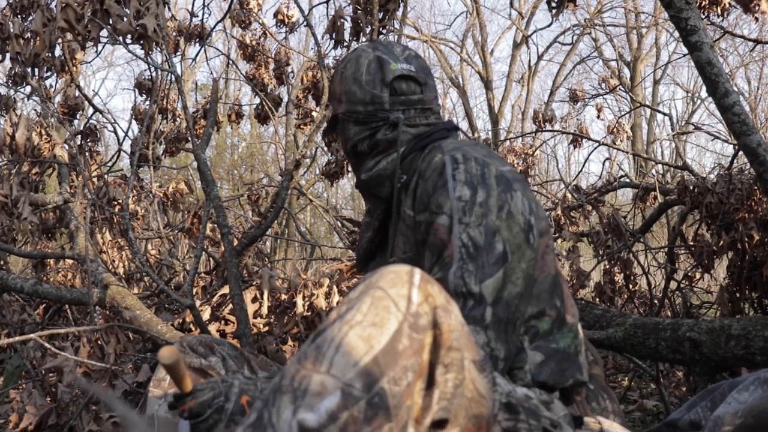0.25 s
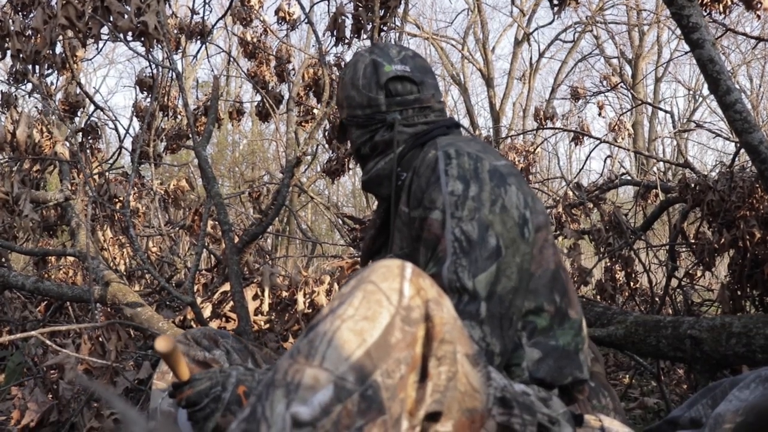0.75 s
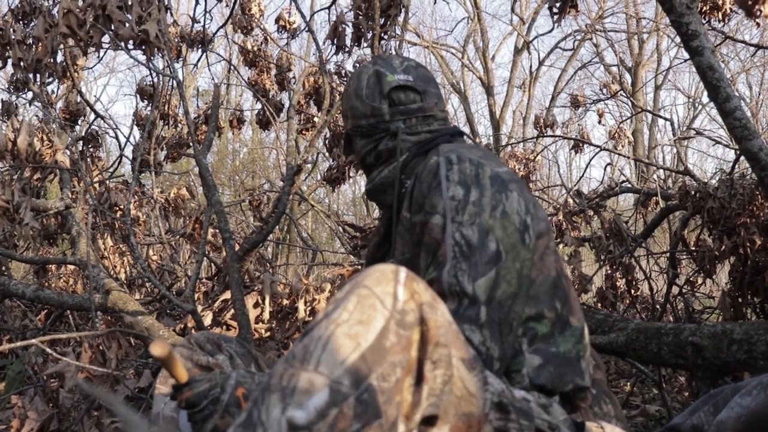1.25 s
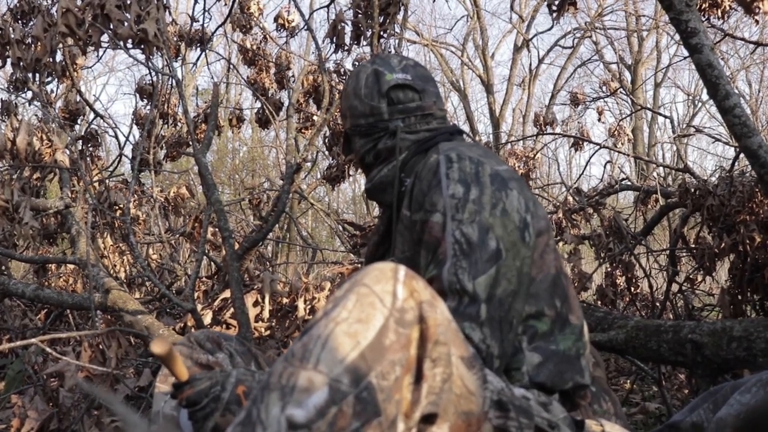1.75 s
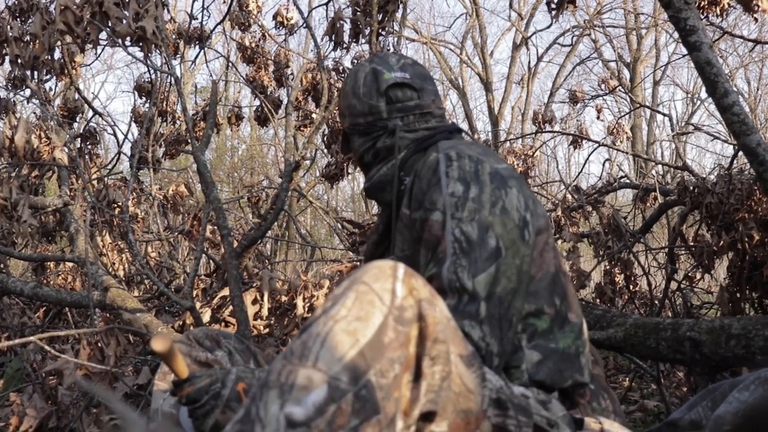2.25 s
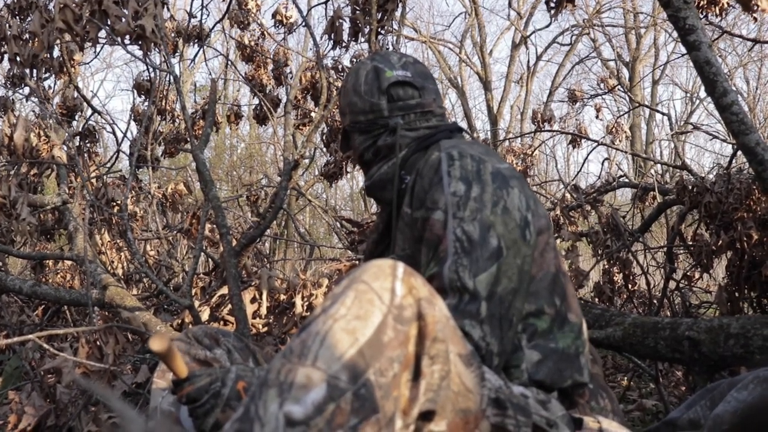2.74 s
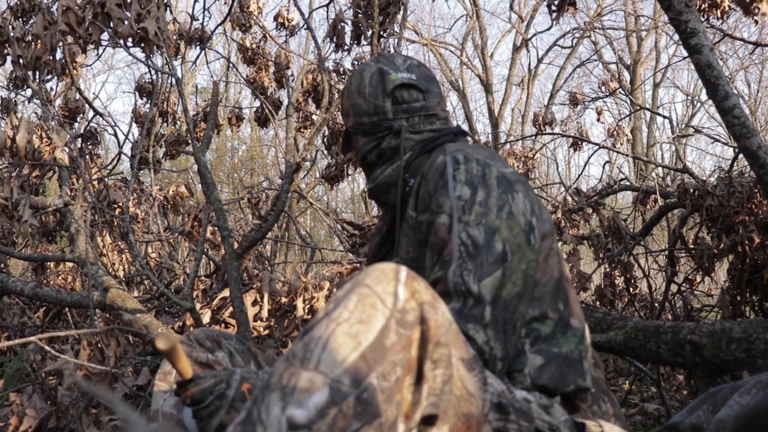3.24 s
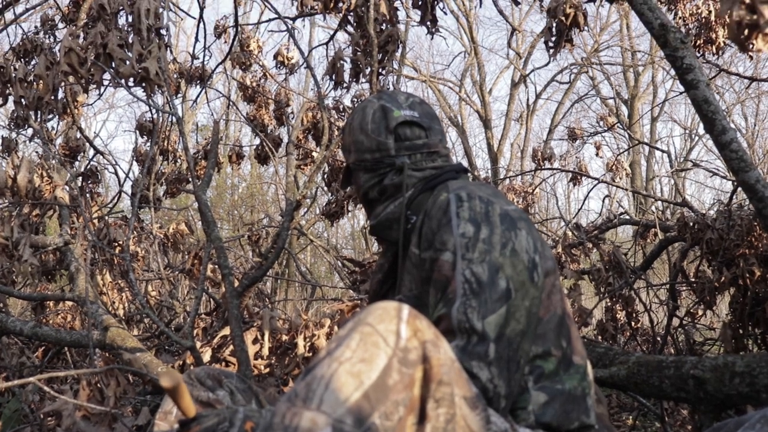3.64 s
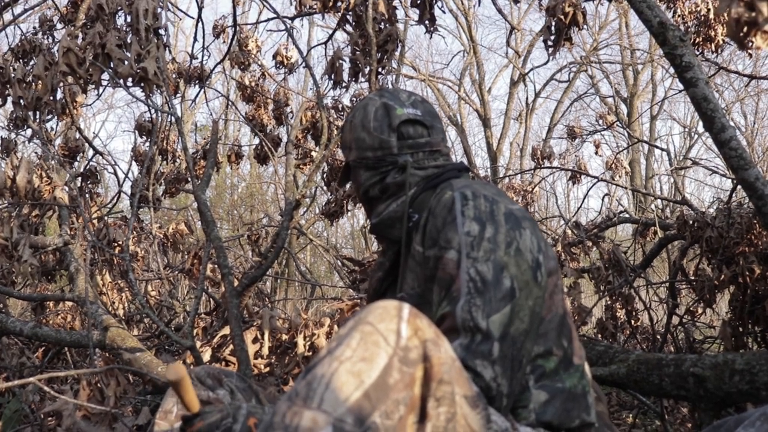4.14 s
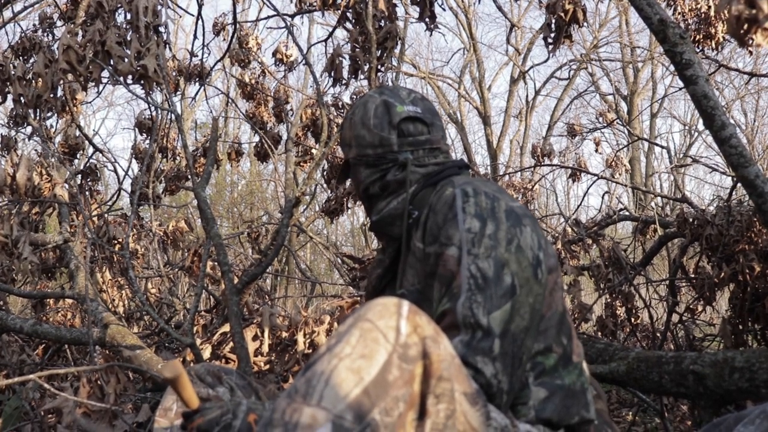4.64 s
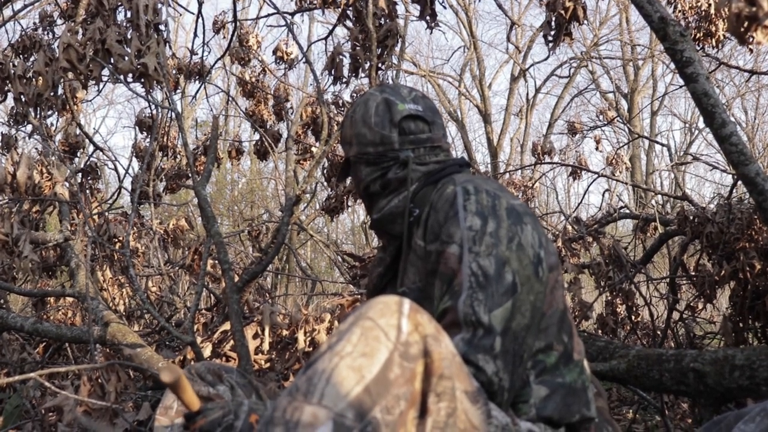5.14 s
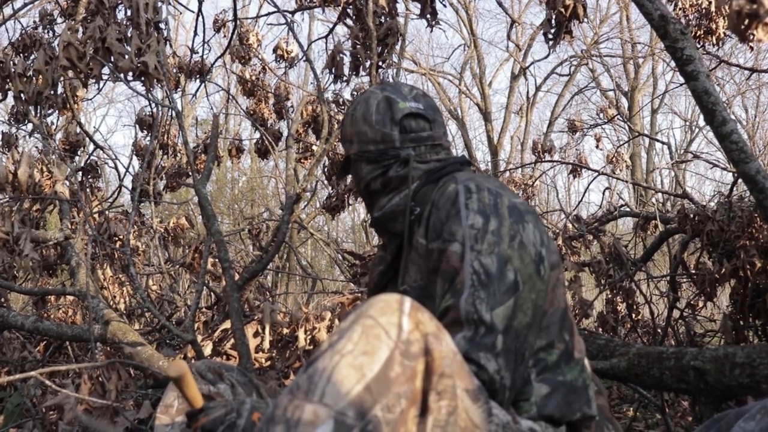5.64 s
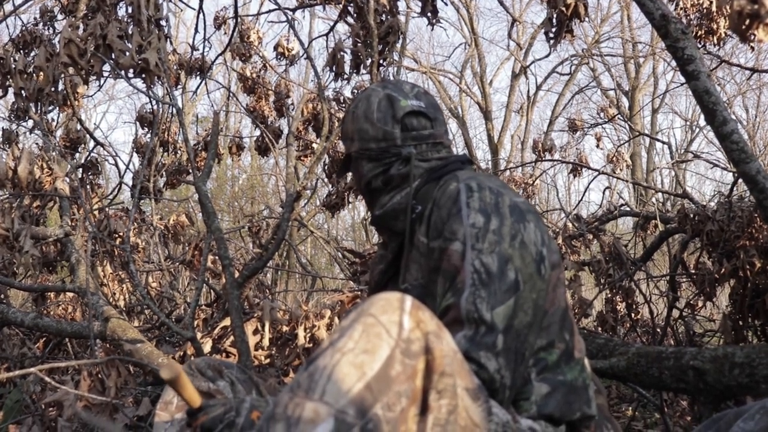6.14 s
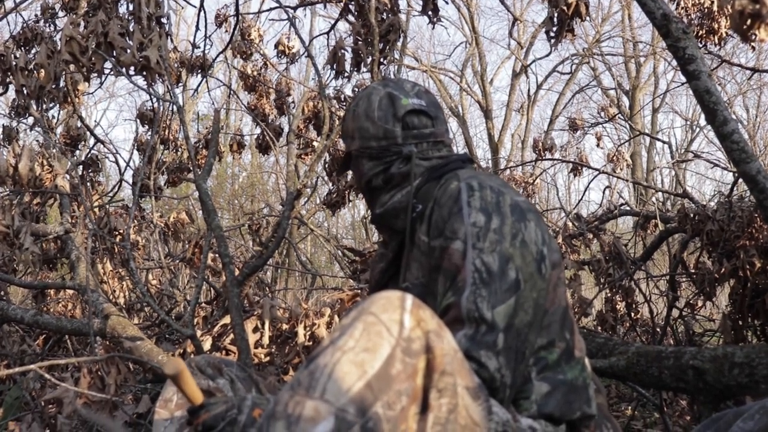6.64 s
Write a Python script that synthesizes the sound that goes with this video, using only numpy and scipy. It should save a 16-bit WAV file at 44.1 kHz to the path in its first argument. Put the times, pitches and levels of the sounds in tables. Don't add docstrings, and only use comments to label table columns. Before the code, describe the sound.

Outdoors in quiet woods, wind thumps softly on the microphone and a far hoarse bird screams. Very close, a striker dragged over a friction call stutters in short purring clusters, pauses, purrs again, then from about three seconds settles into regular, nasal, raspy turkey yelps that grow stronger. Faint dry scrapes fill the gaps as the tip slides back.

```python
import sys
import numpy as np
from scipy import signal
from scipy.fft import rfft, irfft, next_fast_len
from scipy.io import wavfile
from scipy.ndimage import uniform_filter1d, minimum_filter1d

SR = 44100
rng = np.random.default_rng(int(sys.argv[2]) if len(sys.argv) > 2 else 0)


def inscribe(sig):
    pcm = np.round(np.clip(np.atleast_2d(sig).T, -1, 1) * 32767)
    wavfile.write(sys.argv[1], SR, pcm.astype(np.int16))


def to_linear_factor(level_db):
    exponent = np.asarray(level_db, float) / 20
    return 10 ** exponent


N = 303849
T = np.arange(N) / SR


def read(points, hz):
    f, value = np.transpose(points)
    return np.interp(np.log(hz + 1), np.log(f + 1), value)


def noise(points):
    size = next_fast_len(N)
    hz = np.fft.rfftfreq(size, 1 / SR)
    x = irfft(rfft(rng.standard_normal(size)) * to_linear_factor(read(points, hz)), size)[:N]
    return x / np.sqrt(np.mean(x ** 2) + 1e-20)


def wander(hz):
    return noise([(1, -.01), (hz, -.01), (3 * hz, -60)])


def wind():
    # centre in seconds, half length in seconds, buffeting in dB, rush in dB.
    gusts = [(.1, 0.31, -45.5, -61), (0.595, 0.33, -51, -80), (1.09, 0.3, -43, -48.5),
             (1.362, 0.14, -42.5, -54), (1.98, 0.24, -47.5, -77), (2.753, 0.12, -67, -56),
             (2.98, 0.13, -50.5, -59.5), (3.36, 0.15, -47.5, -55.5), (3.65, 0.11, -58, -53.5),
             (6.1, 0.092, -75, -64.5), (6.53, 0.085, -49, -72)]
    # frequency in Hz, level in dB per Hz.
    air = [(35, -33), (60, -0.5), (115, -0.5), (290, -14.5), (550, -19.5), (1000, -12.5), (1700, -16),
           (3300, -12), (5300, -20.5), (15700, -28)]
    calm_buffet_db, calm_rush_db, air_db = -57, -56, -53
    buffet_gain, rush_gain = to_linear_factor(calm_buffet_db), to_linear_factor(calm_rush_db)
    for centre_s, half_s, buffet_db, rush_db in gusts:
        bell = np.exp(-((T - centre_s) / half_s) ** 2)
        buffet_gain = buffet_gain + to_linear_factor(buffet_db) * bell
        rush_gain = rush_gain + to_linear_factor(rush_db) * bell
    buffet = noise([(5, -35.5), (18, 6.5), (35, -11.0), (60, -20.5), (120, -22.5), (300, -69.0)])
    rush = noise([(60, -24), (130, -0.5), (300, -7), (500, -9), (900, -10), (2000, -32.0)])
    lumps = to_linear_factor(1.1 * wander(4))
    return (buffet * buffet_gain + rush * rush_gain * to_linear_factor(-5.5)) * lumps + to_linear_factor(air_db) * noise(air)


def woodland(x):
    t60_s, spacing = 0.38, 22
    taps = np.zeros(SR // 2)
    at = np.arange(500, SR // 2 - spacing, spacing)
    signs = rng.choice([-1., 1.], len(at))
    taps[at + rng.integers(0, spacing, len(at))] = signs * to_linear_factor(-60 * at / SR / t60_s)
    return signal.fftconvolve(x, taps / np.linalg.norm(taps))[:N]


def bird():
    # start in seconds, length in seconds, pitch in Hz, partials two, three and four in dB.
    screams = [(0.173, 0.36, 829, -99, -55, -57), (1.153, 0.29, 832, -71, -57, -56.5),
               (2.36, 0.41, 818, -61, -72, -62), (3.205, 0.27, 848, -83, -61, -58),
               (3.332, 0.21, 815, -86, -55.5, -53.5), (3.591, 0.31, 815, -78, -58, -56.5),
               (4.04, 0.5, 838, -76.5, -76, -58.5), (4.402, 0.2, 790.5, -64.5, -88, -57.5)]
    out = np.zeros(N)
    shake, flutter = wander(65), wander(77)
    for start_s, length_s, hz, *partials_db in screams:
        on = (T >= start_s) & (T < start_s + length_s)
        u = (T[on] - start_s) / length_s
        turns = 2 * np.pi * np.cumsum(hz * (1 + .006 - .022 * u + .011 * shake[on])) / SR
        voice = sum(to_linear_factor(db) * np.cos(k * turns) for k, db in enumerate(partials_db, 2))
        out[on] += voice * np.sin(np.pi * u) ** 0.5 * to_linear_factor(0.76 * flutter[on])
    return out + woodland(out)


def skips():
    # peak in seconds,
    # level in dB, half length in ms, pitch at the peak in Hz.
    slips = [(0.282, -26, 2.96, 746), (.334, -21.5, 5.7, 733), (0.364, -35, 2.8, 744),
             (.392, -19, 4.8, 752), (.434, -18.5, 6.7, 764), (0.479, -17.5, 6.6, 708),
             (1.01, -23.5, 4.9, 738), (1.072, -25, 2.9, 753), (1.147, -20.5, 6.3, 698),
             (1.197, -27.5, 5.1, 745), (1.24, -25.5, 8.2, 735.6), (1.275, -23.5, 11.5, 706.5),
             (1.322, -28, 9.1, 746), (1.62, -32.5, 4.6, 743), (1.65, -25.5, 4.7, 719),
             (1.687, -23, 7.4, 722), (1.727, -20, 6.6, 694), (1.767, -21.5, 8.7, 735),
             (1.807, -23, 6.7, 762.5), (1.838, -23, 6.7, 748),
             (2.152, -37, 6.1, 723), (2.176, -31, 11.5, 713), (2.209, -25.5, 8.8, 671),
             (2.25, -25.5, 7.1, 715.5), (2.276, -27.5, 11.8, 735), (2.304, -30, 12.5, 767),
             (2.33, -26.5, 7.6, 756), (2.678, -33.5, 18.2, 761), (2.714, -27.5, 13.2, 725),
             (2.741, -29.5, 13.5, 734), (2.767, -25, 11.5, 756), (2.798, -25, 13.8, 749),
             (2.826, -22, 14, 736), (3.092, -27, 10.3, 709), (3.122, -24.5, 11, 714),
             (3.888, -35, 10, 703.5), (4.286, -31, 12, 754), (6.166, -36, 3.7, 696), (6.523, -40, 5.2, 714),
             (3.485, -35, 3.2, 763), (3.516, -27.5, 12, 703), (4.699, -23, 5.1, 735),
             (5.787, -21.5, 6.2, 722)]
    # First, middle and higher partials in dB.
    purr_db = (-11, -8.5, -24)
    loose_hz, lean_per_hz, even_hz = 767, .006, 735
    power, power_hz = np.full(N, 1e-12), np.full(N, 750e-12)
    for peak_s, db, half_ms, peak_hz in slips:
        near = slice(round((peak_s - .06) * SR), round((peak_s + 0.087) * SR))
        t = T[near]
        lean = lean_per_hz * (peak_hz - even_hz)
        u = (t - peak_s) * 1000 / half_ms / np.where(t < peak_s, 1 + lean, 1 - lean)
        loosening = np.where(u < 0, .6, 1) * np.minimum(abs(u), 1.4)
        p = to_linear_factor(db - 6 * abs(u) ** 2.9) ** 2
        power[near] += p
        power_hz[near] += p * (peak_hz + (loose_hz - peak_hz) * loosening)
    hardness_db = np.maximum(10 * np.log10(power) + 22, -15)
    partials_db = np.outer(purr_db, np.ones(N))
    partials_db += np.outer([-.3, .4, .6], hardness_db)
    return power, power_hz, partials_db


def catches():
    # centre in seconds, dip in dB, half width in ms, extra grit in dB, pitch bend in %.
    snags = [(2.25, -1.3, 97, 0.5, -0.9), (2.719, 0, 117, 4, -1), (3.104, 1, 4, 1, 3),
             (3.137, -1, 6.3, -6, 1.5), (3.178, -2.5, 14, -1, -3.5), (3.239, -0.5, 9.2, 6, 1.5),
             (3.496, 5.5, 5.9, 17, 3), (3.552, 0.5, 10.6, 0.5, -3), (3.603, 8.5, 6.7, .5, 4),
             (3.624, -2.5, 9, -2, -1), (3.935, -1, 16, -1, -5.5), (3.975, 3, 21, -2, 2),
             (4.31, -1.5, 7.2, 2, -2.5), (4.407, -3, 9.05, -6.5, 1), (4.709, -0.5, 6, -2, 6),
             (5.11, -3, 22, .5, -0.5), (5.145, 4, 24, 2, -.5), (5.202, -2.5, 17, 1, -8),
             (5.797, 1.5, 12, -2, 5), (5.889, 0.2, 10.6, 3, -0.6), (6.195, 0, 8.7, 2.5, 5.5),
             (6.548, -2, 9.5, 1.5, 3.5), (4.741, -2, 27, -4, 0.5), (5.565, -0.5, 10, 3, -2)]
    bells = [np.exp(-((T - s) * 1000 / ms) ** 2) for s, _, ms, *_ in snags]
    dip_db, grit_db, bend_percent = np.transpose(snags)[[1, 3, 4]] @ bells
    return dip_db, grit_db, 1 + bend_percent / 100


def lock_yelps(power, power_hz, partials_db, grit_db, bend):
    # start in seconds, end in seconds, level at grip in dB, top level in dB, lowest 2nd partial in Hz.
    yelps = [(3.13, 3.256, -25, -21, 1462), (3.526, 3.653, -25.5, -20, 1387),
             (3.895, 4.071, -30, -17, 1307), (4.292, 4.434, -24.5, -20, 1360),
             (4.704, 4.848, -24, -18.5, 1358), (5.034, 5.21, -32, -17.5, 1295),
             (5.399, 5.584, -23.5, -16, 1293), (5.784, 5.934, -23, -12, 1324),
             (6.173, 6.317, -24, -15, 1354), (6.522, 6.685, -27.5, -15, 1319),
             (6.87, 7.037, -33, -23.5, 1320)]
    # 2nd partial in Hz, first, middle, higher partials in dB.
    lock = [(1295, -17.5, -21.5, -25.5), (1314, -17.5, -16.5, -22.5), (1340, -14, -12.5, -22),
            (1360, -13.5, -10.5, -28), (1381, -13, -9, -26), (1460, -8.5, -12.5, -33.5),
            (1520, -10.5, -6, -15)]
    grip_s, top_before_end_s, release_s = 0.014, .055, 0.012
    swell_bend, fade_db, fade_bend = 0.88, 9, 1.95
    grip_hz, freed_hz = 1422, 1540
    sag_bend, recover_s, recover_bend = 1.7, .075, 2.6
    dull_per_grit, sharpen_middle, sharpen_high = 0.71, 0.32, 0.69
    rasp_db, rasp_below_hz, rasp_span_hz = 3, 1345, 50
    for start, end, grip_db, top_db, low_hz in yelps:
        on = slice(round(start * SR), round(end * SR))
        t, top = T[on], end - top_before_end_s
        before = np.clip((top - t) / (top - start), 0, 1)
        after = np.clip((t - top) / top_before_end_s, 0, 1)
        short_db = (top_db - grip_db) * before ** (1 / swell_bend)
        db = top_db - short_db - fade_db * after ** fade_bend
        recovery = np.clip(1 - (end - t) / recover_s, 0, 1) ** recover_bend
        hz = low_hz + (grip_hz - low_hz) * before ** sag_bend + (freed_hz - low_hz) * recovery
        edges = np.clip((t - start) / grip_s, 0, 1) * np.clip((end - t) / release_s, 0, 1)
        p = (to_linear_factor(db) * edges) ** 2
        bent_hz = hz * bend[on]
        locked_db = np.array([np.interp(bent_hz, *np.transpose(lock)[[0, k]]) for k in range(1, 4)])
        locked_db += np.outer([0, sharpen_middle, sharpen_high], db + 18)
        locked_db -= np.outer([0, dull_per_grit, 0], grit_db[on])
        partials_db[:, on] += (locked_db - partials_db[:, on]) * p / (p + power[on])
        grit_db[on] += rasp_db * np.clip((rasp_below_hz - bent_hz) / rasp_span_hz, 0, 1)
        power[on] += p
        power_hz[on] += p * hz / 2


def hand():
    power, power_hz, partials_db = skips()
    dip_db, grit_db, bend = catches()
    lock_yelps(power, power_hz, partials_db, grit_db, bend)
    effort = np.sqrt(power) * to_linear_factor(-dip_db)
    weight = uniform_filter1d(effort, size=160)
    hz = uniform_filter1d(bend * power_hz / power * effort, size=160) / weight
    partials_db = uniform_filter1d(partials_db * effort, size=160) / weight
    return abs(weight), np.clip(hz, 600, 820), np.clip(partials_db, -60, 0), grit_db


def slip_tone(effort, turns, middle_db, high_db, rasp_db):
    # frequency in Hz, level in dB.
    pot = [(1900, 2), (2300, -7), (2585, -4), (2680, -2.5), (3100, -22), (3200, -10.5), (3500, -1.5),
           (3780, -14.5), (4000, -6.5), (4300, -9), (4650, -5.5), (5200, -27.5), (6500, -38), (9000, -58)]
    hz = np.gradient(turns) * SR / (2 * np.pi) if turns.ndim > 1 else np.diff(turns, prepend=0) * SR / (2 * np.pi)
    hz[0] = hz[1]
    upper = np.zeros(N)
    for k in range(3, 12):
        level_db = (middle_db if k < 5 else high_db) + read(pot, k * hz)
        level_db += 1.2 * wander(38) + .4 * (k - 2) * wander(130)
        upper += to_linear_factor(level_db) * np.cos(k * turns + np.pi / 2 * (k % 2))
    pot_lag = np.clip(np.interp(T - .002, T, effort) / effort, 0, 3)
    tone = np.cos(2 * turns) + upper * pot_lag
    return effort * tone * np.sqrt(2) * to_linear_factor((.45 + .06 * rasp_db) * wander(70))


def tip_grit(effort, turns, rasp_db):
    # frequency in Hz, level in dB per Hz.
    grit_spectrum = [(500, -34.5), (800, -6.5), (950, 2), (1150, 2), (1550, 1.6), (1800, -6.5),
                     (2600, -13.5), (3600, -28.5), (4350, -10.5), (5300, -25), (8000, -50.5)]
    grit = to_linear_factor(-27 + rasp_db) * noise(grit_spectrum) * (1 + 0.092 * np.cos(turns))
    contact = uniform_filter1d(-minimum_filter1d(-effort, size=900), size=500)
    rubbing = effort ** .5 + .4 * np.interp(T + .014, T, contact) ** .45
    return to_linear_factor(-8.5) * rubbing * grit


def first_partial(effort, hz, turns, low_db, later, letting_go):
    spring_hz, spring_db = 972, -1.5
    freed = uniform_filter1d(np.clip(0.85 * letting_go / (later + effort + 1e-5), 0, 1), size=90)
    spring = 2 * np.pi * np.cumsum((spring_hz - hz) * freed) / SR
    swing = effort * to_linear_factor(low_db) + to_linear_factor(spring_db) * uniform_filter1d(letting_go, size=90)
    spring -= np.maximum.accumulate(spring * (swing < .001))
    return np.sqrt(2) * swing * np.cos(turns + spring)


def free_modes(push):
    # frequency in Hz, width in Hz, level in dB.
    modes = [(815, 50, -1.5), (945, 190, -1), (2240, 100, -12)]
    out = np.zeros(N)
    for f, width_hz, db in modes:
        r = np.exp(-np.pi * width_hz / SR)
        ring = signal.lfilter([1 - r], [1, -r], push)
        turns = 2 * np.pi * np.cumsum(f * (1 + 0.01584 * wander(38.1))) / SR
        out += to_linear_factor(db) * np.sqrt(2) * ring * np.sin(turns)
    return out


def striker():
    onset_db, lag_s = -4, 0.0031
    effort, hz, (low_db, middle_db, high_db), rasp_db = hand()
    turns = 2 * np.pi * np.cumsum(hz * (1 + .0025 * wander(70))) / SR
    later = np.interp(T - lag_s, T, effort)
    sooner = np.interp(T + lag_s, T, effort)
    letting_go = np.maximum(later - 1.185 * effort, 0)
    biting = to_linear_factor(onset_db) * np.maximum(sooner - 1.7 * effort, 0)
    out = slip_tone(effort, turns, middle_db, high_db, rasp_db) + tip_grit(effort, turns, rasp_db)
    out += first_partial(effort, hz, turns, low_db, later, letting_go)
    return out + free_modes(letting_go + biting)


def knocks():
    # start in seconds, level in dB, frequency in Hz, t60 in seconds.
    bumps = [(2.262, -29.5, 187.2, 0.041), (6.548, -45.5, 253, 0.13), (0.34, -41, 760, 0.018),
             (1.123, -30.5, 938, 0.019), (5.8, -42, 3500, .01), (6.493, -60, 3500, .01)]
    out = np.zeros(N)
    for start_s, db, hz, t60_s in bumps:
        t = np.maximum(T - start_s, 0)
        out += to_linear_factor(db - 60 * t / t60_s) * np.sin(2 * np.pi * hz * t) * np.minimum(t / 0.0007, 1)
    return out


def slide_back():
    # start in seconds, length in seconds, level in dB, fade in dB.
    returns = [(0.598, 0.26, -53, 15), (1.385, 0.19, -54, 4), (1.907, 0.16, -52, 9),
               (2.416, .175, -53.5, 5), (2.888, 0.12, -53, 1.5), (3.288, .15, -55, 1.5),
               (3.694, 0.14, -51.5, 7), (4.09, .13, -53, 6), (4.489, 0.14, -55, 1), (4.872, 0.12, -51, 8),
               (5.226, 0.13, -52.5, -2), (5.611, 0.11, -51, 3), (5.968, 0.12, -50.5, 3),
               (6.345, 0.13, -52, 3), (6.709, 0.13, -52.5, -0.5)]
    # frequency in Hz, level in dB per Hz.
    scrape_spectrum = [(500, -31), (800, -4.5), (1000, 2.5), (1350, 1), (1600, -1.5), (1780, -8.5),
                       (2650, -10.5), (3600, -12.5), (5000, -13.5), (6500, -39.5), (9000, -65)]
    # frequency in Hz, level in dB per Hz.
    squeak = [(3600, -32), (4150, -16), (4320, 6.5), (4550, 1.5), (5200, -35)]
    # time in seconds, level in dB.
    squeak_db = [(2.5, -15.5), (4.5, -11.5), (5.3, -7.5), (6.8, -9.5)]
    touch_s, lift_s = 0.028, 0.014
    level = np.zeros(N)
    for start_s, length_s, db, fade_db in returns:
        corners_s = [0, touch_s, length_s - lift_s, length_s]
        level += np.interp(T - start_s, corners_s, [0, 1, to_linear_factor(-fade_db), 0]) * to_linear_factor(db)
    scrape = noise(scrape_spectrum) + to_linear_factor(np.interp(T, *np.transpose(squeak_db))) * noise(squeak)
    grain = to_linear_factor(1.2 * wander(60))
    return to_linear_factor(2.0) * grain * uniform_filter1d(level, size=400) * scrape


def scene():
    wood_db = -33
    call = striker()
    return (wind() + bird() + call + to_linear_factor(wood_db) * woodland(call) + knocks() + slide_back())[None]


def top_cut(x):
    return signal.sosfilt(signal.butter(12, 16160, fs=SR, output="sos"), x)


def record(dry):
    edge_hz = 15850
    lowpass = signal.firwin(511, edge_hz, window=("kaiser", 9), fs=SR)
    dull = signal.oaconvolve(dry, lowpass[None], "same")
    return top_cut(dull)


dry = scene()
out = record(dry)
inscribe(out)
```